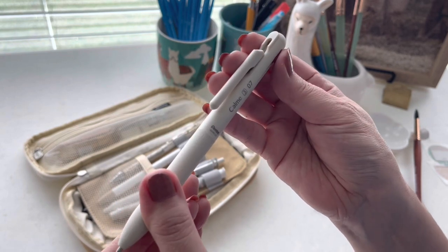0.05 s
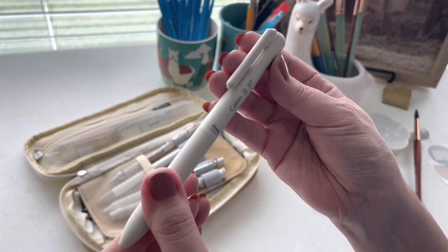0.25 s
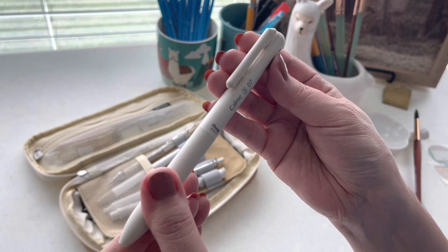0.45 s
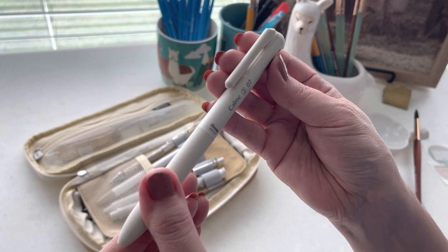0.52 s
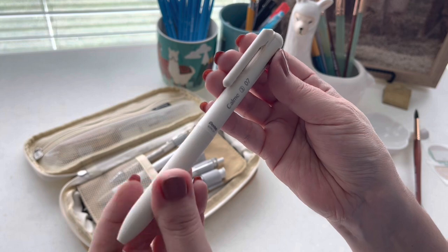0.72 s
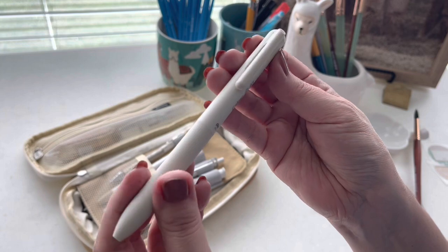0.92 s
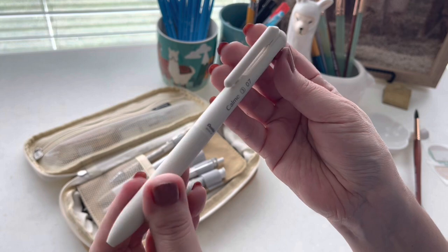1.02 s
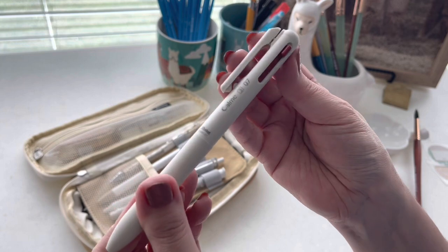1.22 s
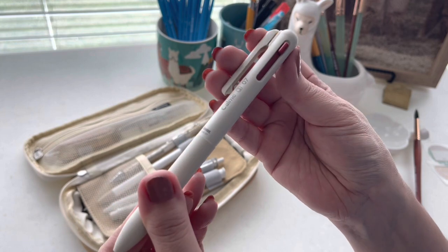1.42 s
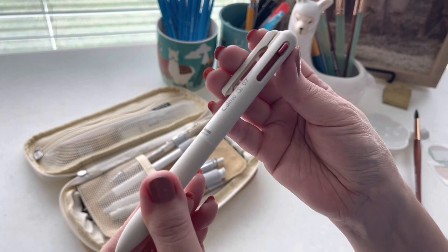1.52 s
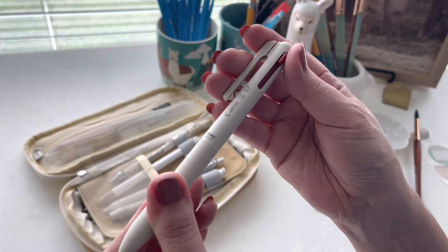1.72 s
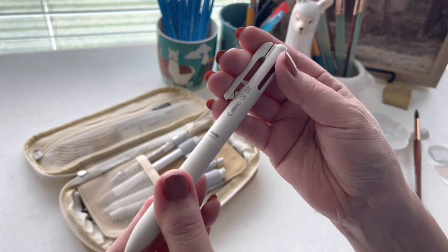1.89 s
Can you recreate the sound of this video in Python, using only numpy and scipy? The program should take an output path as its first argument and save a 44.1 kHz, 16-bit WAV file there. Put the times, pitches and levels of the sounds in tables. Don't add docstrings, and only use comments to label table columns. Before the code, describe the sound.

A multi-colour pen slider gives a faint scrape and tick, then one loud crisp snap; much fainter ticks and barely audible finger rubs follow, close to a phone microphone in a quiet small room.

```python
import sys
import numpy as np
from scipy import signal
from scipy.fft import rfft, irfft, next_fast_len
from scipy.io import wavfile
from scipy.ndimage import uniform_filter1d, map_coordinates

SR = 44100
rng = np.random.default_rng(int(sys.argv[2]) if len(sys.argv) > 2 else 0)


def invert_db(level):
    return 10 ** (np.asarray(level, dtype=float) / 20)


def wav_record(signal):
    frames = np.transpose(np.atleast_2d(signal))
    bounded = np.clip(frames, -1, 1)
    quanta = np.round(bounded * 32767).astype(np.int16)
    wavfile.write(sys.argv[1], SR, quanta)


N = 85995

# t/s, level/dB (9 dB over the onset's rms), contact length/ms, lowest ringing f/Hz, favoured
# f/Hz
SLIDER_CONTACTS = [(0.075, -52.5, 1, 2500, 11400), (0.0801, -36, 0.47, 4000, 11400),
                   (0.0798, -38, 0.74, 3480, 4600), (.0806, -42, 0.84, 1270, 1900),
                   (0.081, -45.5, .2, 3000, 7906), (.2390, -28, .6, 2870, 10000),
                   (.2458, -17, 1, 4000, 11400), (.2488, -25.5, .6, 4000, 11400),
                   (.2508, -9.5, .8, 3000, 11400), (.2514, -5, 0.66, 3000, 11400),
                   (.2517, -9.5, .5, 298, 2450), (0.2543, -18.5, 1, 600, 8500),
                   (0.257, -26.5, 1, 1474, 9900), (0.2615, -32, 1, 1500, 11400)]
# t/s, level/dB (9 dB over the onset's rms), contact length/ms, lowest ringing f/Hz,
# favoured f/Hz
LOOSE_TICKS = [(.5664, -63, 0.94, 5940, 8500), (0.5968, -62, 1, 1505, 2300), (.6740, -49, 0.5, 880, 4400),
               (0.715, -64, 1, 1500, 4600), (.7547, -61, 1, 4500, 8560), (.7710, -50, 1, 2004, 8540),
               (0.7779, -43, 1, 2010, 5400), (0.9561, -59, 0.82, 2000, 3000),
               (1.2420, -54, 0.98, 2800, 3270), (1.4514, -59.5, 1, 3000, 12000),
               (1.8154, -70, 0.99, 1990, 8000), (1.8528, -42, 0.64, 1980, 5280),
               (1.8934, -77, 0.79, 5800, 8060), (1.9378, -48, 0.86, 2175, 3700)]
CHATTER = 0.2
# t/s, length/s, level/dB, lowest f/Hz, share of the length spent rising/1
STROKES = [(.073, 0.018, -52.5, 3070, 0.26), (0.233, 0.016, -30.5, 2986, 1), (.252, 0.013, -32.5, 1500, .1),
           (0.564, .04, -79.5, 6920, .3), (0.662, 0.035, -79, 1500, .5), (0.752, .06, -69, 4198, .5),
           (.935, .04, -71.5, 1994, 0.42), (1.053, .09, -77, 6960, .5), (1.233, .06, -80, 5980, .2),
           (1.563, .095, -69, 7030, .5), (1.81, .075, -63.5, 4010, .6), (1.923, 0.035, -65.5, 2420, 0.49)]
# f/Hz, level/dB, t60/s, sign/1
BARREL_MODES = [(539.6, -15, 0.015, 1), (1150, -14, 0.011, -1), (1900, -13.5, 0.0052, -1),
                (2450, -7, 0.0043, 1), (3230, -14.5, 0.0023, -1), (4600, -8, 0.0025, -1),
                (5400, -8, 0.0041, 1), (7100, -9, 0.0029, -1), (7900, -9, .004, 1), (9000, -5, .005, -1),
                (9900, -11.5, .004, 1), (11400, 1, 0.0032, -1), (13700, -10.5, 0.0027, 1),
                (15294, -8.5, 0.001, -1)]
# f/Hz, level under the snap/dB, t60/s, sign/1
SPRING_AND_DESK_MODES = [
    (182.25, -44.5, 0.08, 1),
    (330, -40.5, 0.054, 1),
    (2457, -49.5, 0.27, 1),
    (5880, -53, .35, 1),
]
RISE_S, SCATTER_DB = 0.00015, 2.5
FAVOUR_DB, FAVOUR_OCTAVES = 4.5, 0.25
RADIATES_HZ = 250
# f/Hz, level/dB
FRICTION_COLOUR = [(1500, -2), (4900, -3.5), (6500, -7), (8300, 0.5), (10100, -6), (11500, 3), (13500, -14),
                   (16000, -15)]
GRAINS_PER_S, GRAIN_DB = 7200, 5

LEFT_DB, LEFT_LAG_S = 2.87, -0.000018
DESK_DB, DESK_S, RIGHT_DESK_S = -12.5, 0.0009, 0.000809
# f/Hz, t60/s
ROOM_DECAY = [(200, 0.42), (1000, .2), (2500, .27), (8000, 0.24), (14000, 0.11)]
# f/Hz, level/dB
REVERB_COLOUR = [(150, -14.5), (500, -11), (1400, -9), (2400, -3.5), (4000, -12), (8500, -5.5), (11600, -1),
                 (14500, -14)]
ROOM_DB, ROOM_BUILD_S, ROOM_ALIKE = -17.5, 0.03, 0.4

# f/Hz, level/dB per Hz
AIR_SPECTRUM = [(22, -28.5), (45, -1.5), (85, 1.5), (200, -8), (400, -15), (800, -23), (1600, -28),
                (4000, -39.5)]
# f/Hz, level/dB per Hz
HISS_SPECTRUM = [(800, -6.5), (3000, 0), (8500, -0.5), (9700, -3.5), (11300, 0), (12600, 0.5), (13200, -10),
                 (15000, -21)]
AIR_DB, HISS_DB = -66, -82.5
# f/Hz, correlation/1
NOISE_LIKENESS = [(60, 0.93), (180, 0.93), (550, 0.55), (1650, 0.26), (4970, 0.65), (15000, 0.98)]
# f/Hz, level/dB, wander knots per second/Hz
HUM_PARTIALS = [(98.8, -66, 18), (201.2, -78, 8.7), (301, -81.5, 16)]
HUM_WANDER_RAD, HUM_WANDER_DB = 0.98, 2

TOP_HZ = 16000
# low f/Hz, high f/Hz, threshold level/dB
WEAK_BANDS = [(9800, 10450, -87), (12900, 13500, -105), (13500, 14500, -88), (14500, 15100, -105),
              (15100, 16500, -104)]


def clicks():
    out = np.zeros(N)
    t = np.arange(SR // 20) / SR
    contact_t = t[:400]
    for s, db, ms, low_hz, favoured_hz in SLIDER_CONTACTS + LOOSE_TICKS:
        blow = CHATTER * rng.standard_normal(400) + (contact_t == 0)
        force = blow * np.exp(-contact_t * 2000 / max(ms, 0.05))
        hit = np.convolve(force, ring(BARREL_MODES, t, low_hz, favoured_hz))
        onset_rms = np.sqrt(np.mean(hit[:60] ** 2))
        add(out, s, invert_db(db - 9) * hit / onset_rms)
    out = filtered(out, lambda hz: (1j * hz / (RADIATES_HZ + 1j * hz)) ** 3)
    s, db = max(SLIDER_CONTACTS, key=lambda row: row[1])[:2]
    add(out, s, invert_db(db) * ring(SPRING_AND_DESK_MODES, np.arange(SR // 2) / SR))
    return out


def ring(modes, t, low_hz=1, favoured_hz=1):
    luck = rng.standard_normal(len(modes))
    total = 0
    for (hz, db, t60, sign), e in zip(modes, luck):
        octaves = np.log2(hz / favoured_hz)
        favour = invert_db(FAVOUR_DB * np.exp(-(octaves / FAVOUR_OCTAVES) ** 2))
        lift = favour / (1 + (low_hz / hz) ** 4)
        decay = invert_db(db + SCATTER_DB * e - 60 * t / t60)
        total = total + np.sign(sign) * lift * decay * np.sin(2 * np.pi * hz * t)
    return (1 - np.exp(-t / RISE_S)) * total


def rubs():
    out, size = np.zeros(N), SR // 8
    for s, length, db, low_hz, rise in STROKES:
        draw = rng.standard_normal(size)
        lumps = map_coordinates(rng.standard_normal(size), [np.arange(size) * GRAINS_PER_S / SR / 4])
        grit = filtered(draw * invert_db(GRAIN_DB * lumps),
                        lambda hz: invert_db(along(FRICTION_COLOUR, hz)) / (1 + (low_hz / (hz + 1)) ** 4))
        stroke = np.interp(np.arange(size) / SR / length, [0, np.clip(rise, 0.05, 0.95), 1], [0, 1, 0])
        add(out, s, invert_db(db) * unit(grit) * np.sin(stroke * np.pi / 2))
    return out


def near(x):
    def late(hz, s):
        return np.exp(-2j * np.pi * hz * np.array(s)[:, None])

    def paths(hz):
        return late(hz, [LEFT_LAG_S, 0]) + invert_db(DESK_DB) * late(hz, [DESK_S, RIGHT_DESK_S])

    return invert_db([[LEFT_DB], [-LEFT_DB]]) * filtered(x, paths)


def room(x):
    envelope = np.sqrt(abs(uniform_filter1d(x ** 2, size=33)))
    shed = rng.standard_normal(N) * envelope
    hz, t, z = signal.stft(rng.standard_normal((2, SR // 2)), SR, nperseg=128)
    decay_db = 60 * t / along(ROOM_DECAY, hz)[:, None]
    shape = invert_db(along(REVERB_COLOUR, hz)[:, None] - decay_db) * (1 - np.exp(-t / ROOM_BUILD_S))
    noise = signal.istft(z * shape, SR, nperseg=128)[1]
    tail = pair(noise, lambda f: np.full_like(f, ROOM_ALIKE))
    return signal.fftconvolve(shed[None], tail / np.linalg.norm(tail[0]), axes=1)[:, :N]


def background():
    air = invert_db(AIR_DB) * noise_bed(AIR_SPECTRUM)
    hiss = invert_db(HISS_DB) * noise_bed(HISS_SPECTRUM)
    t = np.arange(N) / SR
    hum = 0
    for hz, db, rate in HUM_PARTIALS:
        level = invert_db(db + 2.5 + HUM_WANDER_DB * wobble(rate))
        hum = hum + level * np.sin(2 * np.pi * hz * t + HUM_WANDER_RAD * wobble(rate))
    return invert_db([[0.5], [-0.5]]) * (air + hiss + hum)


def noise_bed(spectrum):
    noise = filtered(rng.standard_normal((2, N)), lambda hz: invert_db(along(spectrum, hz)))
    return unit(pair(noise, lambda hz: along(NOISE_LIKENESS, hz)))


def pair(x, alike):
    def weights(hz):
        turn = np.arccos(np.clip(alike(hz), -1, 1)) / 2
        return np.array([np.cos(turn), np.sin(turn)])

    mid, side = filtered(x, weights)
    return np.array([mid + side, mid - side])


def wobble(rate):
    return map_coordinates(rng.standard_normal(200), [np.arange(N) * min(rate, 90) / SR])


def unit(x):
    return x / np.sqrt(np.mean(x ** 2) + 1e-20)


def along(points, hz):
    f, v = np.transpose(points)
    return np.interp(np.log(hz + 1), np.log(f + 1), v)


def filtered(x, response):
    m = next_fast_len(x.shape[-1] + 8192)
    return irfft(rfft(x, m) * response(np.fft.rfftfreq(m, 1 / SR)), m)[..., :x.shape[-1]]


def add(track, s, x):
    part = track[round(s * SR):][:len(x)]
    part += x[:len(part)]


def scene():
    pen = clicks() + rubs()
    return near(pen) + invert_db(ROOM_DB) * room(pen) + background()


def band_limit(x):
    return signal.sosfilt(signal.butter(12, 16590, fs=SR, output="sos"), x)


def record(dry):
    hz, _, z = signal.stft(dry, SR, nperseg=1024)
    keep = np.ones(z.shape[1:]) * (hz < TOP_HZ)[:, None]
    for low, high, db in WEAK_BANDS:
        band = (hz >= low) & (hz < high)
        band_rms = np.sqrt(np.mean(abs(z[:, band]) ** 2, axis=(0, 1)))
        keep[band] *= band_rms > invert_db(db)
    mix = signal.istft(z * keep, SR, nperseg=1024)[1][:, :N]
    return band_limit(mix)


dry = scene()
out = record(dry)
wav_record(out)
```